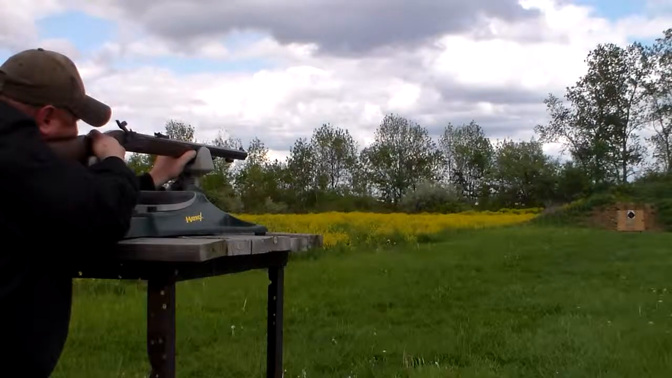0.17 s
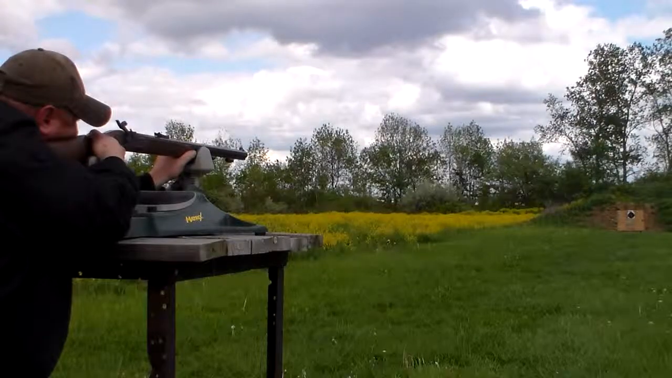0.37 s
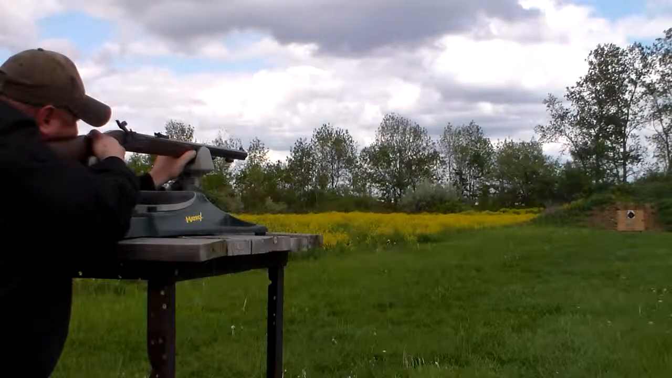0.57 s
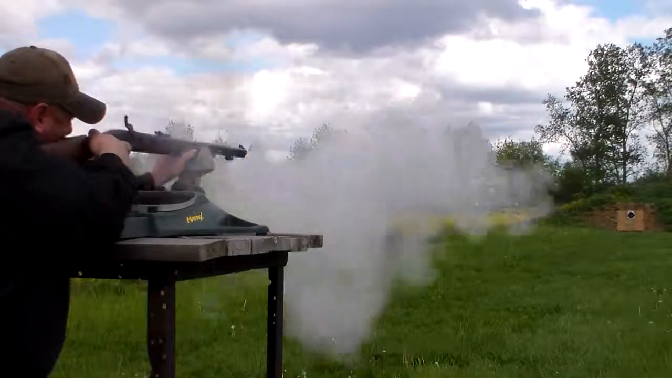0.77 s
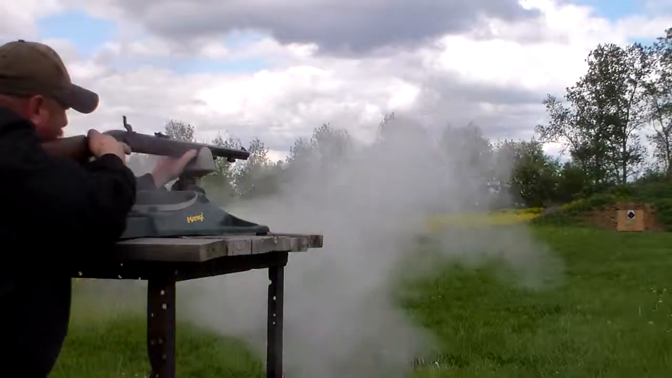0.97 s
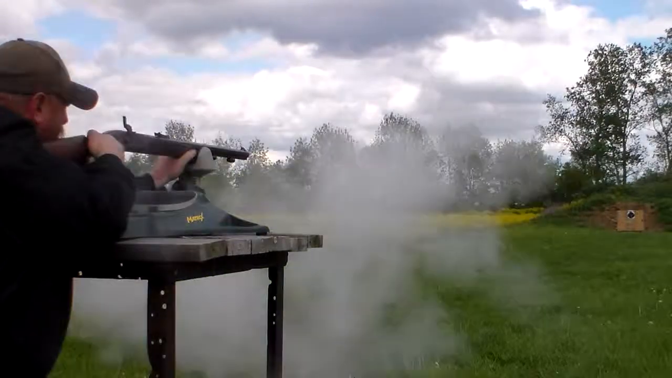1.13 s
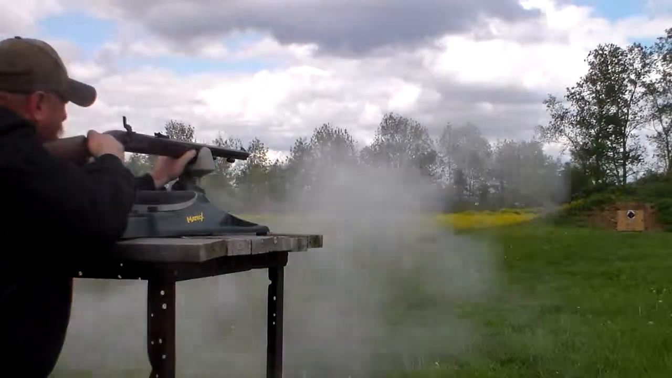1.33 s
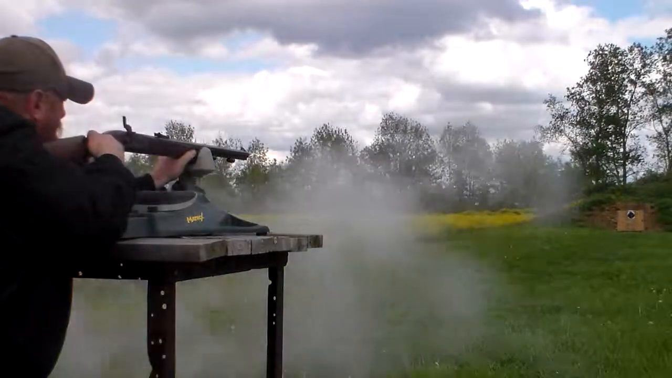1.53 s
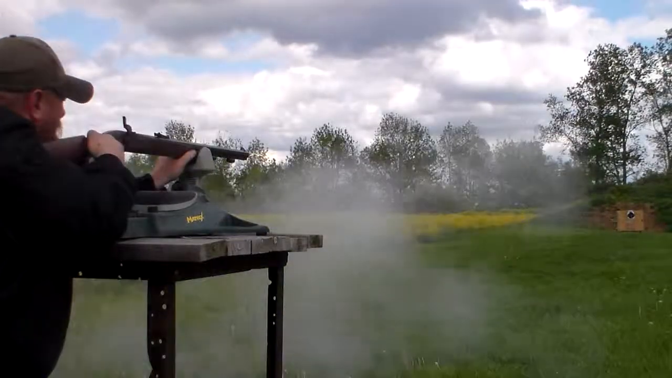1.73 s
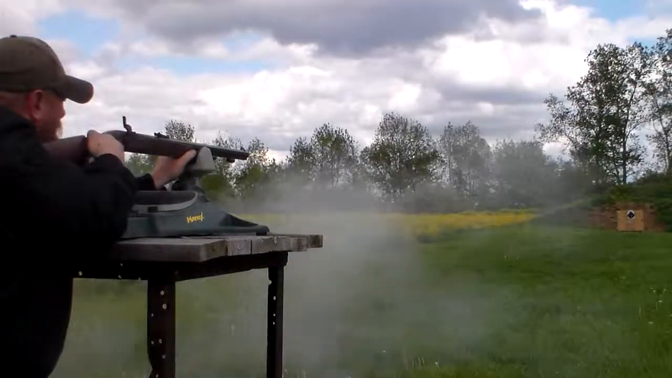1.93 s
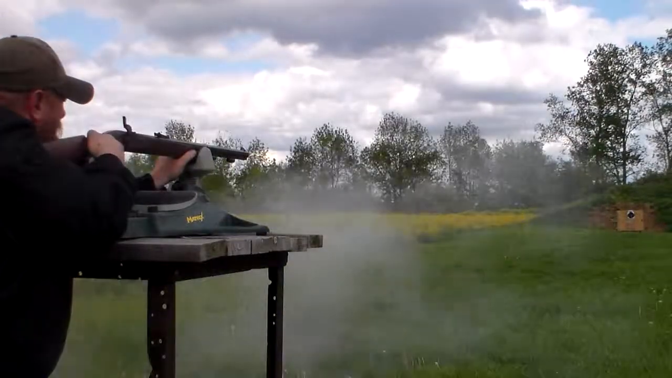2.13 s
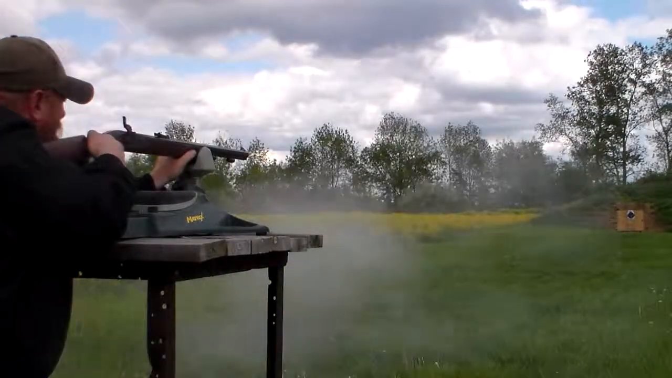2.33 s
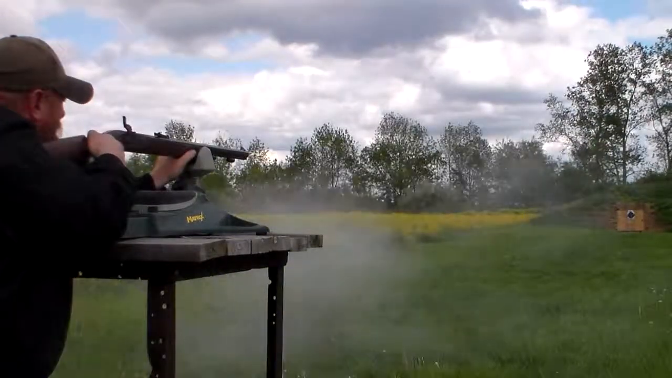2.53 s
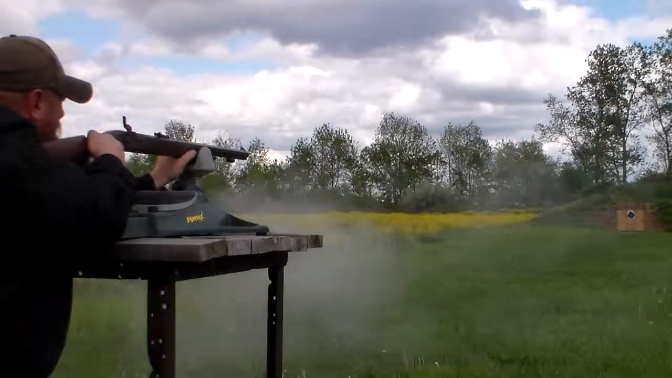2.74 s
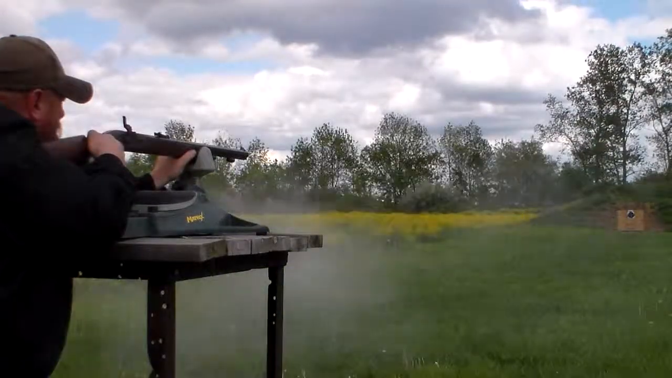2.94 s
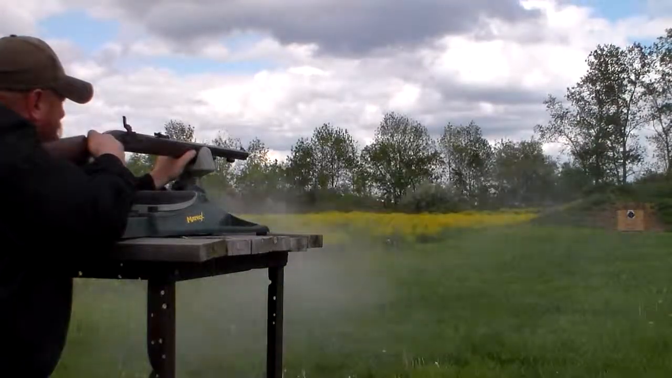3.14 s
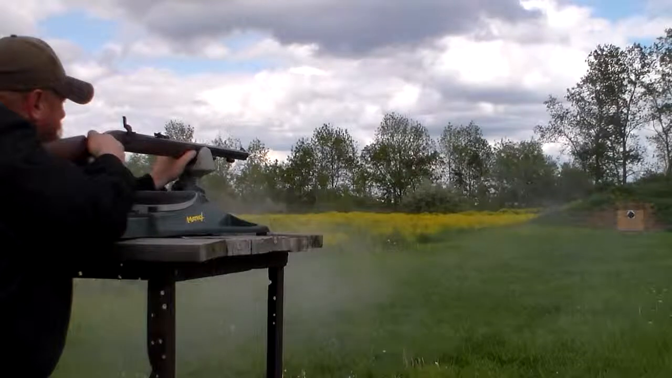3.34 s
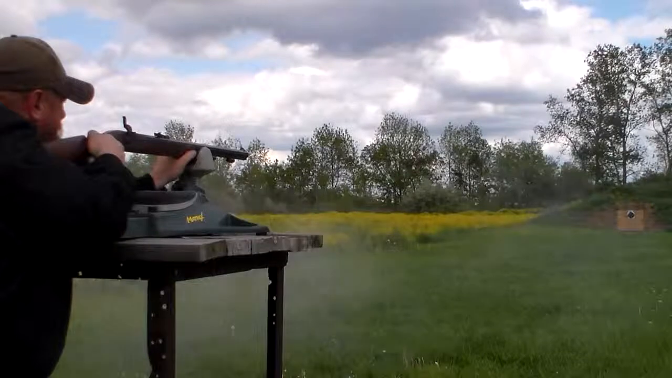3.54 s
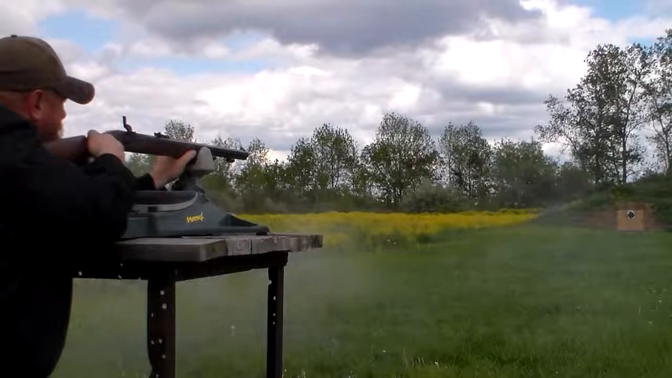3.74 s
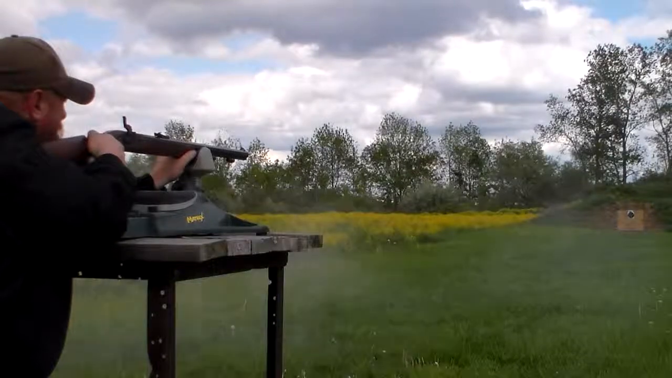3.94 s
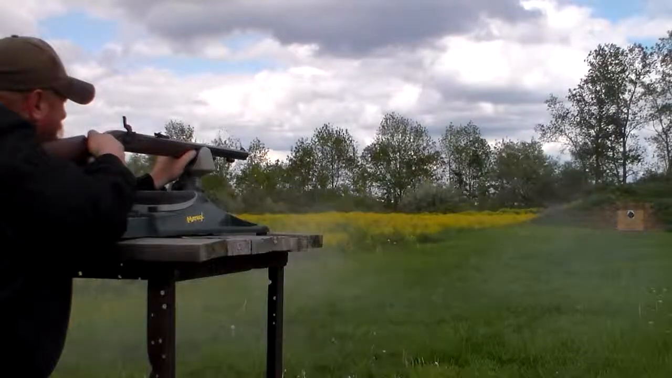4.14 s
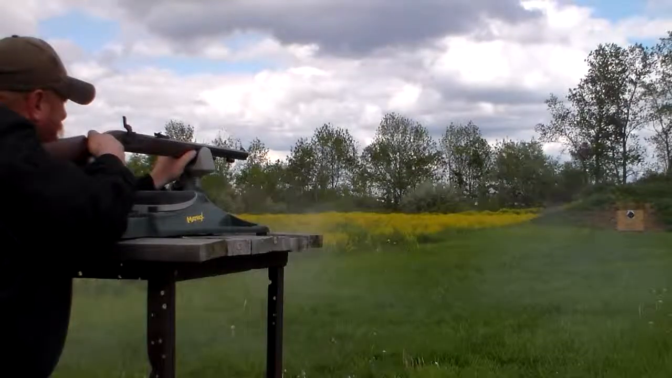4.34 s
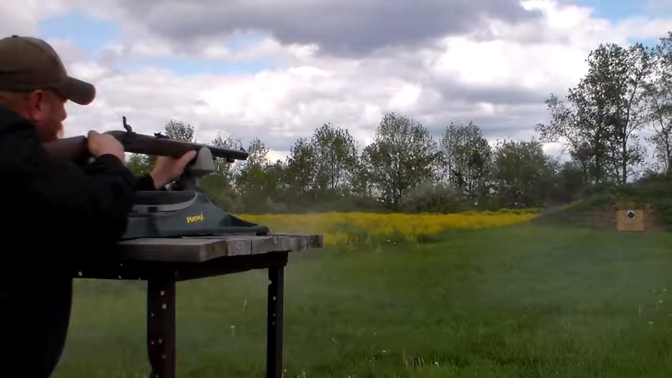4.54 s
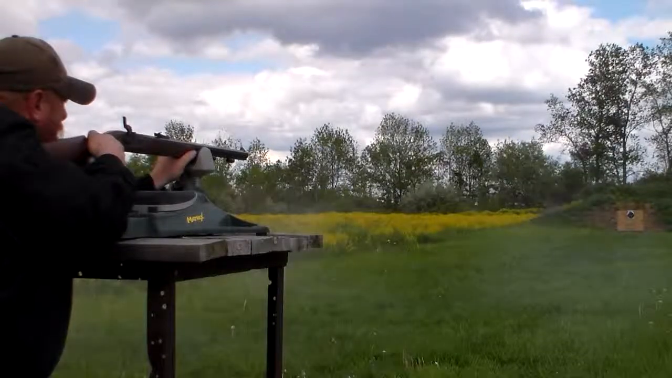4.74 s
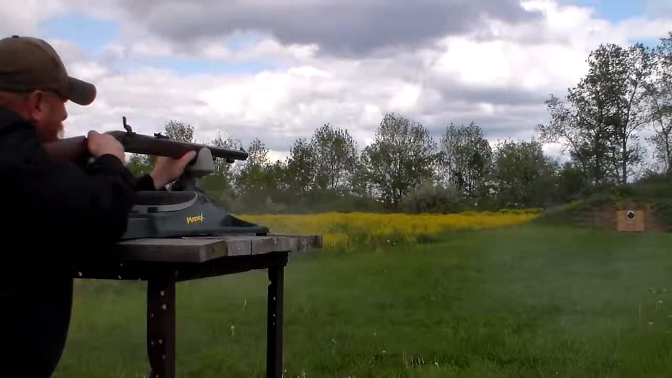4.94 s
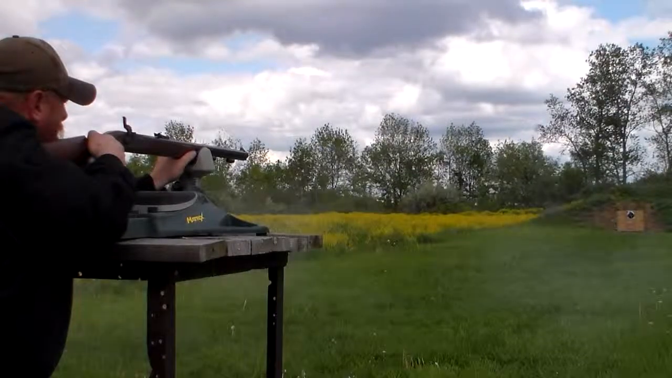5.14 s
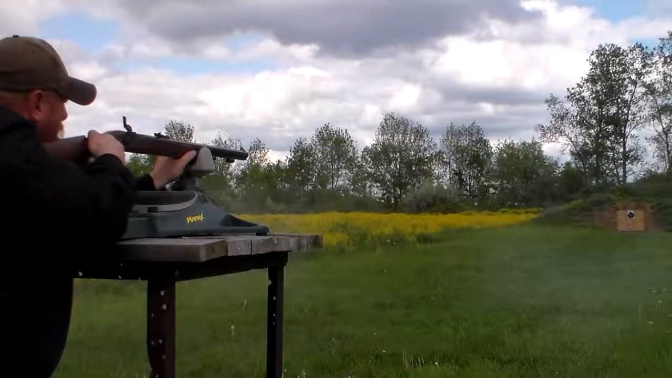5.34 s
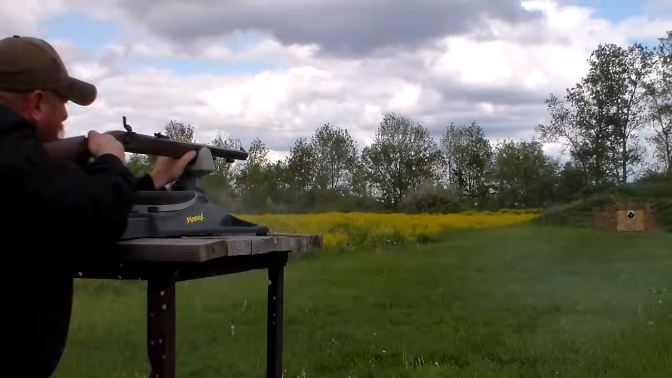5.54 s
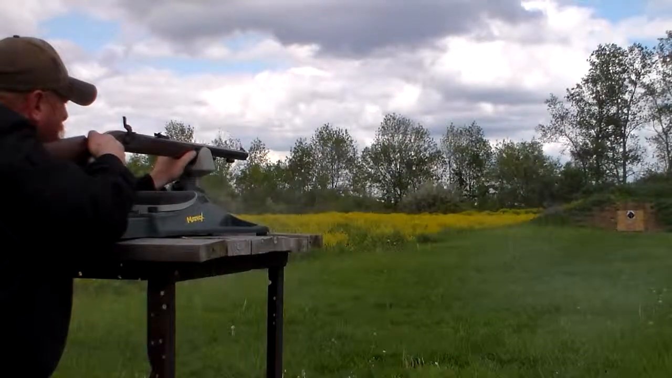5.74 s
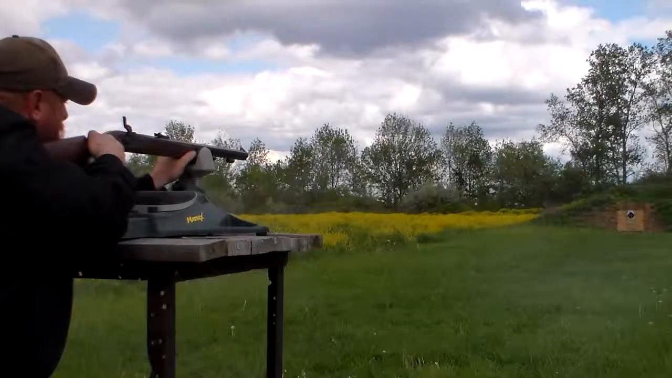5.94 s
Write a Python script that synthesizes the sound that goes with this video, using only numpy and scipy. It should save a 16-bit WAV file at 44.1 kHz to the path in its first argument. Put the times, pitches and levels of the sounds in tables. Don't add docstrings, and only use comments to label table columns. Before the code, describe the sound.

A quiet outdoor hum with wind rumble, a sudden clipped gunshot with a sharp backstop slap and fading echoes, then small birds chirping.

```python
import sys
import numpy as np
from scipy import signal
from scipy.io import wavfile
from scipy.ndimage import uniform_filter1d

SR = 44100
rng = np.random.default_rng(int(sys.argv[2]) if len(sys.argv) > 2 else 0)


def generate_wav(signal):
    frames = np.transpose(np.atleast_2d(signal))
    scaled = np.clip(frames, -1, 1) * 32767
    pcm = np.round(scaled).astype(np.int16)
    wavfile.write(sys.argv[1], SR, pcm)


def invert_db(x):
    u = np.asarray(x, float) / 20
    return 10 ** u


N = 264644
T = np.arange(N) / SR

# [t/s, gain/dB]
GAIN_CONTROL = [
    (0, -0.5),
    (.88, -3.5),
    (.9, -21.5),
    (1.61, -19.5),
    (1.71, -2.5),
    (1.9, 1),
    (6.1, 1),
]


def evened(x):
    return x / np.sqrt(np.mean(x ** 2) + 1e-20)


def read(points, hz):
    f, value = np.transpose(points)
    return np.interp(np.log(hz + 1), np.log(f + 1), value)


def curves(rows):
    s, *columns = np.transpose(rows)
    return [np.interp(T, s, column) for column in columns]


def humps(rows):
    s, db, rise, fall = np.transpose(rows)[:4, :, None]
    return invert_db(db - 10 * np.maximum((s - T) / rise, (T - s) / fall))


def add(mix, s, sound):
    part = mix[..., round(s * SR):][..., :sound.shape[-1]]
    part += sound[..., :part.shape[-1]]


def band(x, lo_hz, hi_hz):
    return signal.sosfilt(signal.butter(3, [lo_hz, hi_hz], "bandpass", fs=SR, output="sos"), x)


def noise(shape, same, patchy_db, size=1024):
    hz = np.fft.rfftfreq(size, 1 / SR)
    a, b, c, d, patch = rng.standard_normal((4 * N // size + 5, len(hz), 5)).T
    patch = uniform_filter1d(patch, size=9, axis=0)
    patch = evened(uniform_filter1d(patch, size=9, axis=1))
    like = np.clip(read(same, hz), -1, 1)[:, None]
    left = a + 1j * b
    right = like * left + np.sqrt(1 - like ** 2) * (c + 1j * d)
    z = np.array([left, right]) * invert_db(read(shape, hz)[:, None] + patchy_db * patch)
    return evened(signal.istft(z, nperseg=size, noverlap=3 * size // 4)[1][:, :N])


def reflection_swarm():
    # [f/Hz, level/dB per Hz]
    near_colour = [(60, -51.5), (100, -24), (160, -13), (230, -5.5), (410, -4), (600, -10), (1200, -9.5),
                   (2500, -13), (4000, -18.5), (6000, -22), (10000, -23), (14000, -31.5), (15200, -56)]
    far_colour = [(60, -24), (100, -10.5), (190, -8.5), (300, -32.5), (480, -35.5), (750, -3.5), (1000, -5),
                  (1600, -2.5), (4000, -16), (7000, -29), (9000, -55.5)]
    # [f/Hz, likeness]
    blast_likeness = [(60, .99), (130, .99), (290, .995), (640, .97), (1400, .93), (3090, .8), (6790, .2),
                      (14900, .03)]
    far = np.clip((T - 1.0) / .17, 0, 1)
    swarm = (1 - far) * noise(near_colour, blast_likeness, 1.2, size=256)
    swarm += far * noise(far_colour, blast_likeness, 1.5, size=256)
    swarm *= invert_db(2.5 * evened(uniform_filter1d(rng.standard_normal(N), size=60)))
    mid = band(swarm, 500, 4000)
    treble = band(swarm, 4000, 16000)
    bass = (1 - far) * band(swarm, 70, 500) + far * band(band(swarm, 80, 300), 80, 300)
    return [x / np.sqrt(uniform_filter1d((x ** 2).mean(0), size=8000)) for x in (mid, treble, bass)]


def arrival_power():
    # [t/s, peak level/dB, bass/dB, 60 dB decay/s]
    arrivals = [(.8635, -18.5, -16, .13), (.8749, -2, -14, .05), (.8813, 8, -11, .09), (.892, -1, -3, .09),
                (.902, -6.5, -3, .12), (.914, -9, -7, .14), (.930, -3, -7, .12), (.945, -8, -7, .12),
                (.957, -11.5, -3, .12), (.972, -23, 4, .12), (1.035, -28, 3, .1), (1.112, -27, 3, .08),
                (1.149, -26.5, 0, .1), (1.165, -27, 5, .07)]
    # [t/s, peak level/dB]
    bank_echoes = [(1.213, -25.5), (1.243, -26), (1.26, -19.5), (1.282, -23), (1.329, -23.5),
                   (1.346, -23.5), (1.355, -27.5), (1.367, -32.5), (1.469, -27.5), (1.519, -37),
                   (1.537, -32), (1.68, -33)]
    # [t/s, level/dB, 10 dB rise/s, 10 dB fall/s]
    rolling_echoes = [
        (.98, -42, .01, .2),
        (1.165, -36, .075, .025),
        (1.27, -41.5, .07, .04),
        (1.37, -43.5, .065, .02),
        (1.53, -39.5, .09, .045),
        (1.73, -45, .08, .3),
        (1.9, -39, .25, .25),
    ]
    fired_s, echo_bass_db, echo_t60_s = .8813, -15, .042
    first_rise_s, late_rise_s, softening_s = .0005, .0022, .03
    first_treble_db, dulled_db, dulling_s = 2.5, -16.5, .06

    power = np.zeros((3, N))
    t = T[:SR // 2]
    decay_speed = np.array([[1], [1.15], [.8]])
    echoes = [(s, db, echo_bass_db, echo_t60_s) for s, db in bank_echoes]
    for s, db, bass_db, t60 in arrivals + echoes:
        late = max(s - fired_s, 0)
        treble_db = first_treble_db + dulled_db * (1 - np.exp(-late / dulling_s))
        rise_s = late_rise_s + (first_rise_s - late_rise_s) * np.exp(-late / softening_s)
        shape = np.minimum(t / rise_s, 1) * invert_db(db - 6.5 - 60 * t * decay_speed / t60)
        add(power, s, (shape * invert_db(np.array([[0], [treble_db], [bass_db]]))) ** 2)

    late = np.clip(T - 1, 0, 1)
    fresh_db = 5 * np.exp(-late / .04)
    colour_db = np.array([0 * T, -3 - 32 * late + fresh_db, 3 - 14 * late])
    return power + (humps(rolling_echoes) ** 2).sum(0) * invert_db(colour_db) ** 2


def shot():
    # [t/s, peak level/dB, ring f/Hz, 60 dB decay/s]
    slaps = [(.8749, -1, 1900, .008), (.885, -6, 410, .09), (.893, -7, 230, .12), (.930, -3, 900, .012),
             (1.04, -26, 185, .08), (1.1305, -15, 520, .022), (1.158, -27, 270, .07),
             (1.104, -30, 230, .07), (1.13072, -6.5, 2350, .0035), (1.13125, -4.5, 4000, .005),
             (1.1309, -20, 7200, .005), (1.1314, -14, 1200, .012), (1.1336, -11, 2100, .008),
             (1.2615, -21, 1500, .012), (1.347, -25, 1500, .012), (1.215, -31, 1100, .014),
             (1.285, -27, 1050, .02), (1.331, -30, 1500, .015)]
    backstop_s, blunting = 1.13, .004
    out = sum(np.sqrt(power) * x for power, x in zip(arrival_power(), reflection_swarm()))
    t = T[:2000]
    for s, db, hz, t60 in slaps:
        rise_s = 1e-5 + blunting * max(s - backstop_s, 0)
        front = invert_db(db - 60 * t / t60) * (1 - np.exp(-t / rise_s))
        add(out, s, -front * np.sin(2 * np.pi * hz * t)[None])
    return out / invert_db(curves(GAIN_CONTROL)[0])


def wind():
    # [t/s, level/dB, 10 dB rise/s, 10 dB fall/s, left-right balance/dB]
    gusts = [(.2, -33.5, .3, .25, 5), (.5, -31, .25, .36, 7), (1.9, -54, .3, .6, 0),
             (3.45, -48, .5, .25, 2), (4.45, -50, .15, .1, -9), (4.82, -48, .08, .12, -3),
             (5.2, -41, .09, .5, 5), (5.45, -44, .3, .1, 5), (5.7, -45, .2, .1, 4),
             (5.78, -28, .017, .02, 13), (5.92, -38, .25, .11, 10)]
    # [f/Hz, level/dB per Hz]
    wind_colour = [(10, -20), (20, -4), (45, 0), (100, -3), (160, -9), (250, -21), (400, -36), (700, -70)]
    calm_db = -64
    side_db = np.transpose(gusts)[4]
    power = invert_db(np.array([side_db, -side_db])) @ humps(gusts) ** 2 + invert_db(2 * calm_db)
    lumps_db = 3.5 * evened(band(rng.standard_normal((2, N)), 4, 22))
    return noise(wind_colour, [(10, .2), (500, .2)], 1.0) * np.sqrt(power) * invert_db(lumps_db)


def hum():
    # [t/s, shaft f/Hz, level/dB]
    shaft_hum = [(0, 125, -36), (.16, 127, -33.5), (.33, 125, -39.5), (.5, 128.5, -35.5), (.84, 128, -30),
                 (1.9, 126.5, -36), (2.05, 126, -38), (2.75, 127, -30.5), (3.0, 125, -35.5),
                 (3.26, 126, -50), (3.55, 126, -41.5), (3.85, 125.5, -38), (4.22, 125.5, -39.5),
                 (4.88, 125.2, -50), (5.19, 125, -47), (5.25, 124.5, -43), (5.87, 125, -42), (6, 126, -46)]
    # [t/s, level/dB, 10 dB rise/s, 10 dB fall/s]
    second_swells = [(.12, -46, .2, .3), (.5, -40, .2, .6), (3.01, -47.5, .1, .4), (3.92, -52, .07, .08),
                     (5.87, -49.5, .9, .15)]
    sixth_swells = [(.5, -46, .05, .17), (2.4, -58, .9, .4), (3.55, -55, .2, .15), (4.8, -46, .35, .17),
                    (5.87, -49.5, .5, .15)]
    hz, db = curves(shaft_hum)
    turn = 2 * np.pi * np.cumsum(uniform_filter1d(hz, size=20000)) / SR
    lead = np.array([[.07], [-.07]])
    waver_db = 1.5 * evened(band(rng.standard_normal((3, N)), 2.5, 18))
    levels = invert_db(db), humps(second_swells).max(0), humps(sixth_swells).max(0)
    tones = np.zeros((2, N))
    for k, level, waver in zip((1, 2, 6), levels, waver_db):
        tones += level * invert_db(waver) * np.sqrt(2) * np.sin(k * turn + lead / k)
    return tones * invert_db(np.array([[-.7], [.7]]))


def note(length, db, from_hz, to_hz, glide_s=1., peak=.5, start_db=-3, end_db=-3):
    t = T[:round(length * SR)]
    glide = (1 - np.exp(-t / glide_s)) / (1 - np.exp(-length / glide_s))
    u = t / length - np.clip(peak, .05, .95)
    arch_db = np.where(u < 0, start_db * (u / peak) ** 2, end_db * (u / (1 - peak)) ** 2)
    edges = np.clip(np.minimum(t, length - t) / .0013, 0, 1)
    tone = np.sin(2 * np.pi * np.cumsum(from_hz + (to_hz - from_hz) * glide) / SR)
    return np.sqrt(2) * invert_db(db + arch_db) * edges * tone


def trill(length, db, hz, rate):
    slur_hz = 680
    t = T[:round(length * SR)]
    uneven = 1 + .06 * evened(band(rng.standard_normal(len(t)), 15, 60))
    along = np.cumsum(rate / SR * uneven) % 1
    tone = np.sin(2 * np.pi * np.cumsum(hz + slur_hz * (along - .5)) / SR)
    tone *= .8 + .45 * evened(band(rng.standard_normal(len(t)), 60, 500))
    fade = invert_db(db - 8 * t / length) * np.minimum(t / .02, 1)
    return fade * 1.9 * tone * np.sin(np.pi * along) ** 0.82


def among_trees(song):
    t = T[:SR // 3]
    hits = rng.random((2, len(t))) < .03
    taps = rng.standard_normal((2, len(t))) * hits * invert_db(-60 * t / .32) * (t > .008)
    trees = signal.fftconvolve(song[None], taps / np.linalg.norm(taps[0]), axes=1)[:, :N]
    return invert_db(-.8) * np.array([song, np.roll(song, 2)]) + invert_db(-9) * trees


def birds():
    # [t/s, length/s, level/dB, f/Hz]
    thin_notes = [(2.388, .11, -54, 6200), (2.748, .092, -45, 6165), (3.025, .097, -49.5, 6070),
                  (3.265, .088, -44.5, 6050), (3.437, .034, -50.5, 5950), (3.476, .045, -52, 5985),
                  (3.545, .025, -57, 5990), (3.583, .065, -50, 5975), (3.695, .042, -45.5, 5925),
                  (3.808, .036, -47.5, 5940)]
    # [t/s, level/dB]
    sweet_notes = [
        (4.166, -41.5),
        (4.54, -41),
    ]
    # [t/s, length/s, level/dB]
    high_whistles = [
        (4.32, .17, -60),
        (4.693, .19, -59.5),
    ]
    # [t/s, length/s, level/dB, from f/Hz, to f/Hz]
    tiny_chips = [
        (3.535, .015, -62, 2800, 2550),
        (3.66, .012, -58, 2600, 2920),
        (3.768, .014, -57, 2740, 2650),
        (4.94, .01, -61, 4550, 5000),
    ]
    # [t/s, length/s, level/dB, middle f/Hz, notes per s]
    buzzy_trills = [
        (3.895, .25, -54, 4400, 62),
        (4.34, .17, -57.5, 4470, 75),
        (5.02, .13, -58.5, 2900, 95),
    ]
    song = np.zeros(N)
    for s, length, db, hz in thin_notes:
        sagging = note(length, db, hz * 1.006, hz * .994, peak=.4, start_db=-15, end_db=-15)
        add(song, s, sagging)
    for s, db in sweet_notes:
        add(song, s, note(.019, db - 7, 3740, 3400, peak=.4, start_db=-7, end_db=-9))
        add(song, s + .03, note(.082, db, 2600, 3260, glide_s=.02, peak=.6, start_db=-14, end_db=-4))
    for s, length, db in high_whistles:
        held = note(length, db, 6300, 7440, glide_s=.004, peak=.3, start_db=0, end_db=-18)
        flutter_db = 2.5 * evened(band(rng.standard_normal(len(held)), 15, 70))
        add(song, s, held * invert_db(flutter_db))
    for s, *chip in tiny_chips:
        add(song, s, note(*chip))
    for s, *run in buzzy_trills:
        add(song, s, trill(*run))
    return among_trees(song)


def tick():
    out = np.zeros((2, N))
    click = invert_db(-43 - 60 * T[:400] / .02) * evened(band(rng.standard_normal(400), 5000, 8000))
    add(out, 5.597, click * np.array([[1], [-.3]]))
    return out


def wash():
    # [f/Hz, level/dB per Hz]
    wash_colour = [(15, -46.5), (25, -8), (74, -4.5), (123, -7), (240, -12.5), (299, -17.5), (374, -17),
                   (436, -17), (743, -11.5), (1180, -15.5), (2010, -33.5), (2570, -36), (5000, -50.5),
                   (6500, -89), (11000, -120)]
    # [f/Hz, likeness]
    wash_likeness = [(60, 1), (130, 1), (290, 0.99), (640, 0.98), (1400, .9), (3090, 0.57), (6790, 0.016)]
    # [t/s, level/dB]
    road_swell = [(0, -44.5), (.84, -41), (2.4, -45), (2.8, -47), (4.0, -45.5), (4.3, -46.5), (4.65, -44),
                  (5.0, -46), (6.0, -46)]
    x = noise(wash_colour, wash_likeness, 1.2)
    db = curves(road_swell)[0]
    bright_db = 1.8 - .5 * (db - np.median(db))
    x = x + (invert_db(bright_db) - 1) * band(x, 1000, 8000)
    return x * invert_db(db) / np.std(band(x, 400, 1100))


def input_hiss(gain_db):
    # [f/Hz, level/dB per Hz]
    hiss_colour = [(1500, -21.5), (3000, -3), (4000, -4.5), (5800, -8.5), (7900, -10), (11000, -11.5),
                   (14100, -11), (14400, -60)]
    hiss = noise(hiss_colour, [(10, 0), (20000, 0.001)], .4, size=256)
    return hiss * invert_db(-62 + .55 * gain_db)


def overload_swing():
    t = np.maximum(T - .878, 0)
    push = -2.9 * (np.exp(-t / .026) - np.exp(-t / .013))
    for leak_s in (.075, .6):
        push = signal.lfilter([1, -1], [1, -np.exp(-1 / (leak_s * SR))], push)
    return push * np.array([[1.04], [.96]])


def scene():
    return shot() + wind() + hum() + birds() + tick() + wash()


def top_cut(x):
    return signal.sosfilt(signal.butter(12, 15540, fs=SR, output="sos"), x)


def record(dry):
    gain_db = curves(GAIN_CONTROL)[0]
    mix = dry * invert_db(gain_db) + input_hiss(gain_db) + overload_swing()
    return top_cut(np.clip(mix, -1, 1))


dry = scene()
out = record(dry)
generate_wav(out)
```